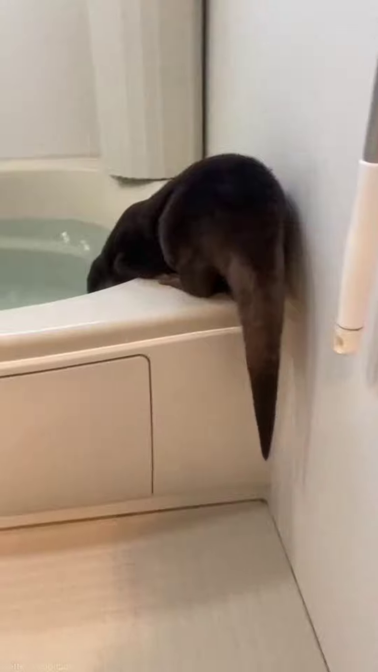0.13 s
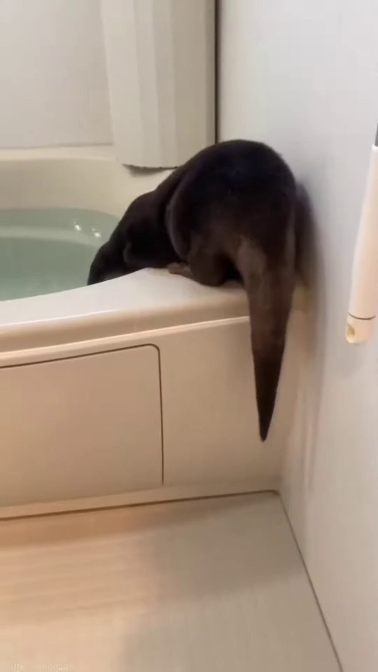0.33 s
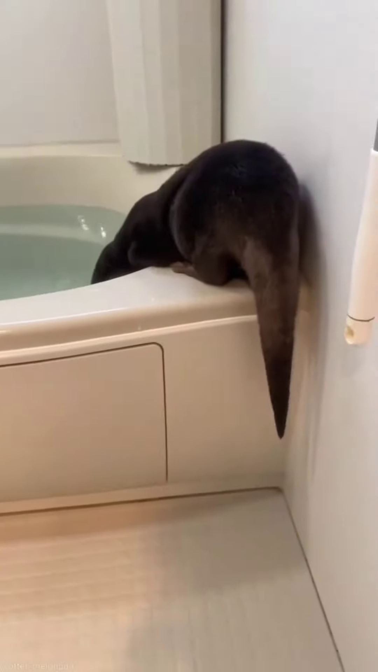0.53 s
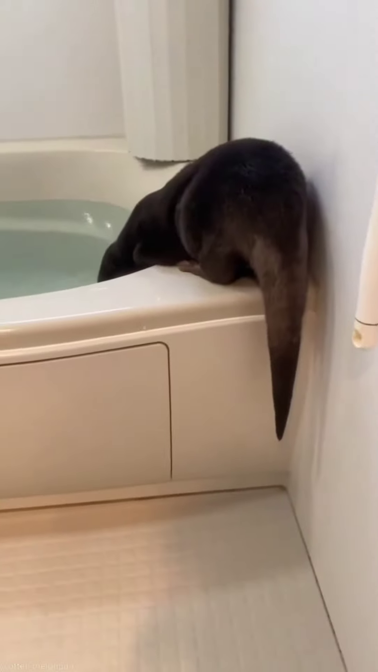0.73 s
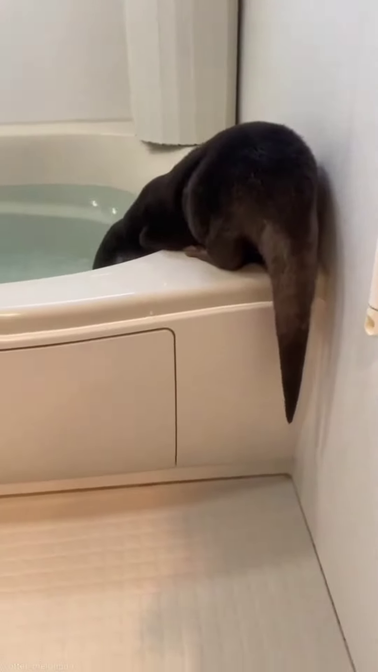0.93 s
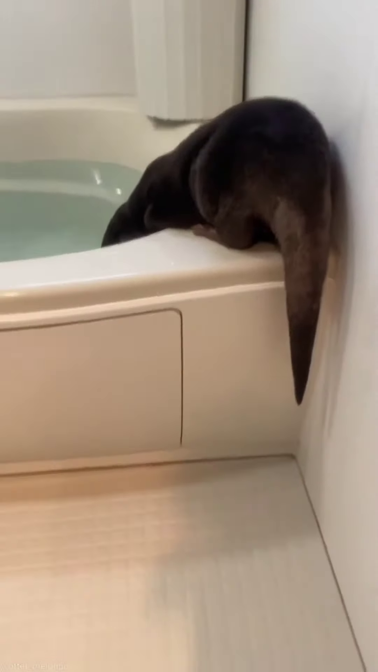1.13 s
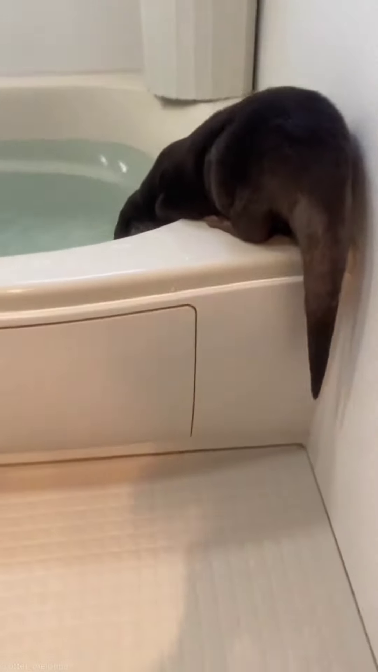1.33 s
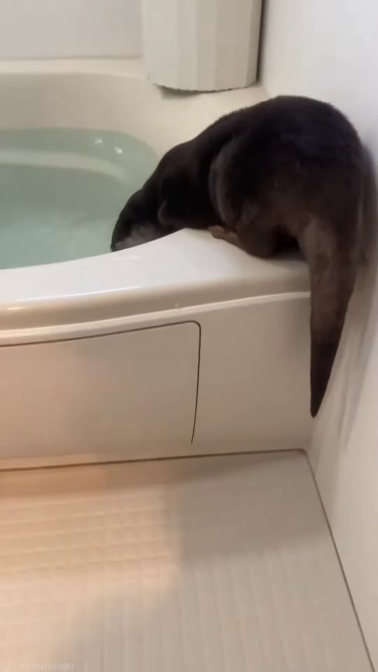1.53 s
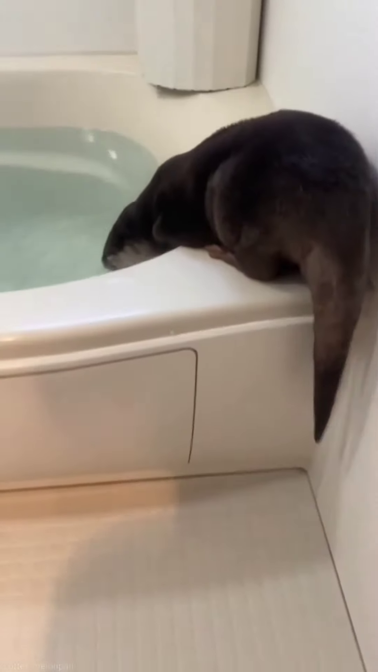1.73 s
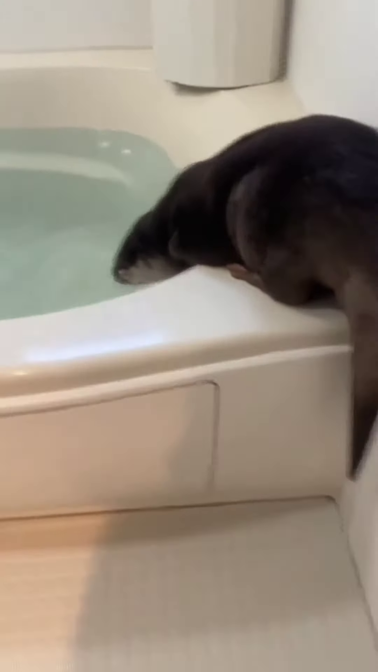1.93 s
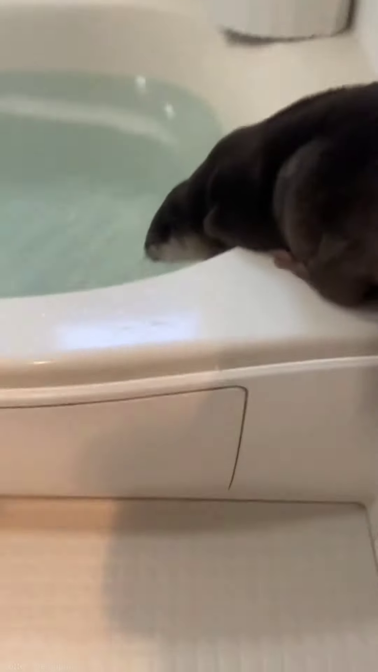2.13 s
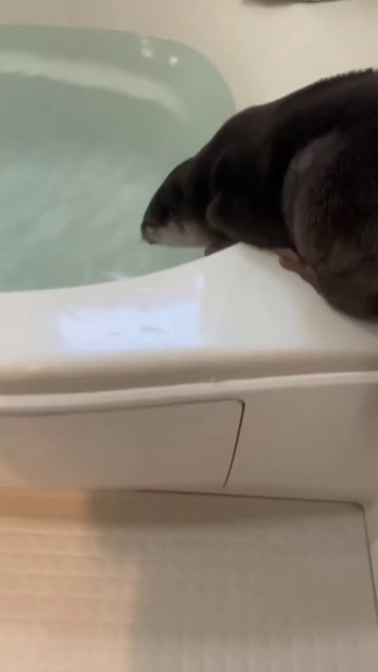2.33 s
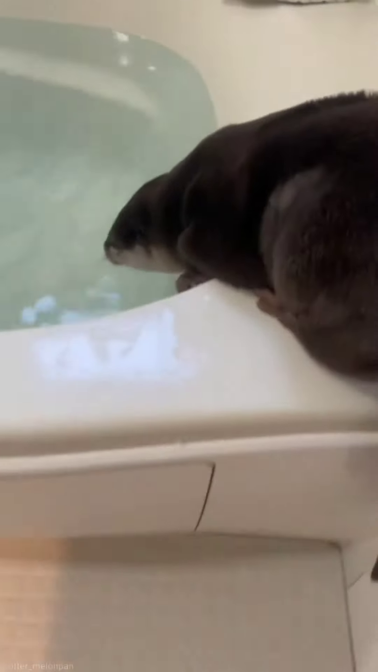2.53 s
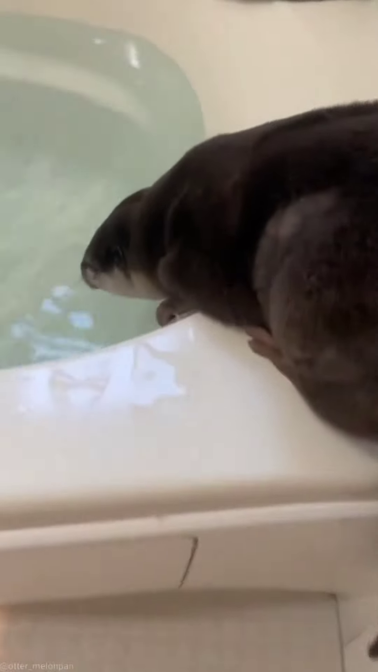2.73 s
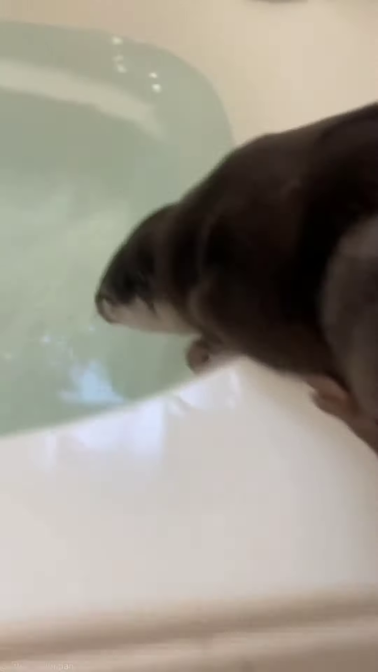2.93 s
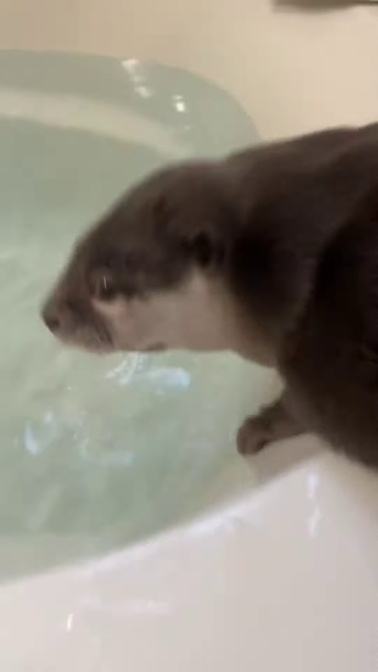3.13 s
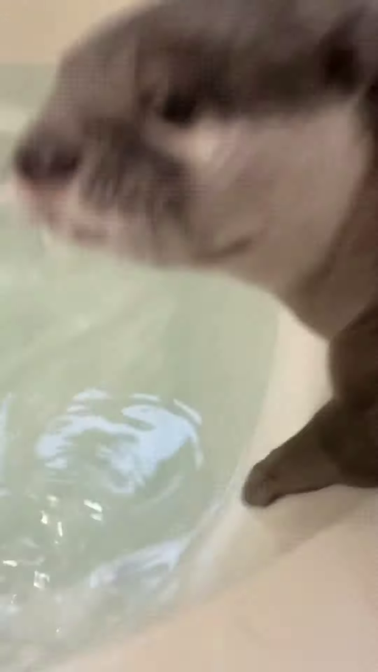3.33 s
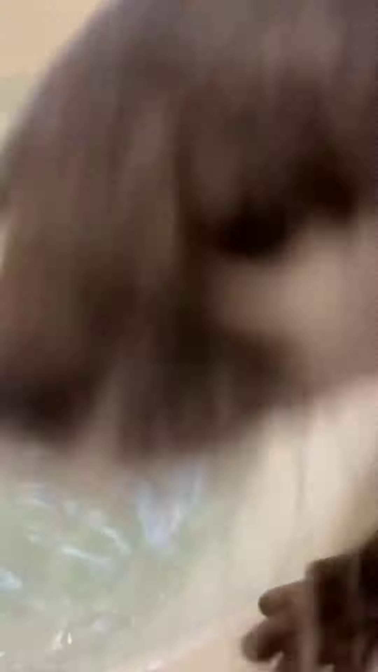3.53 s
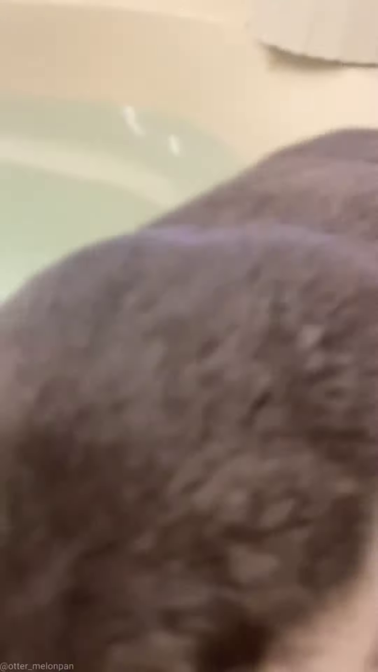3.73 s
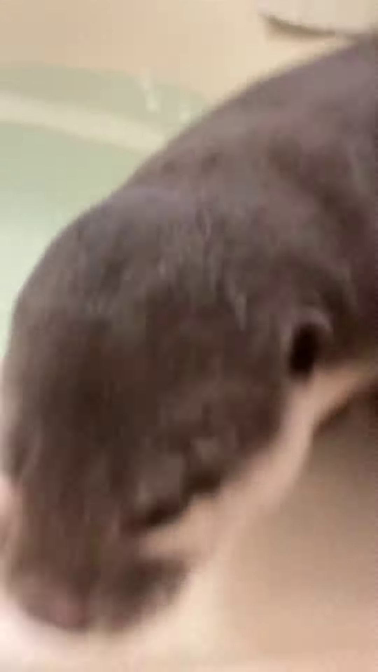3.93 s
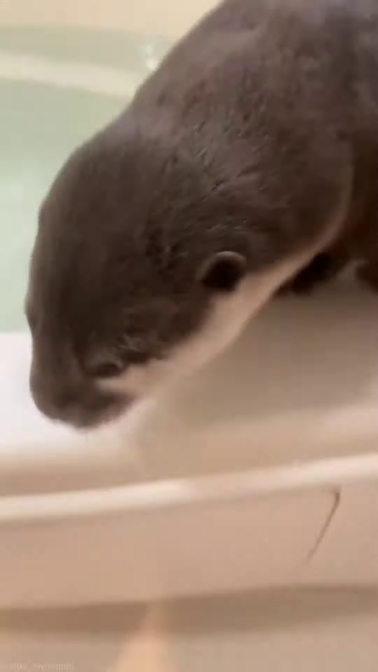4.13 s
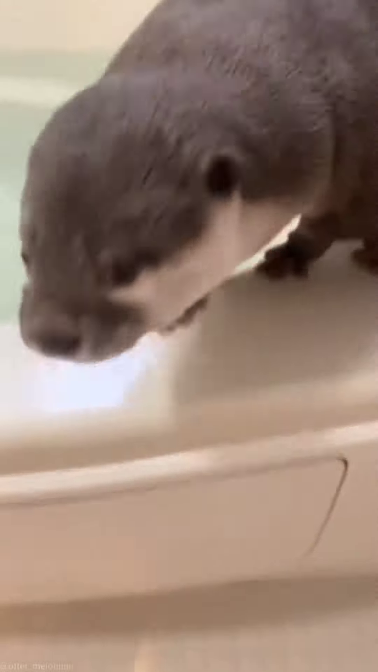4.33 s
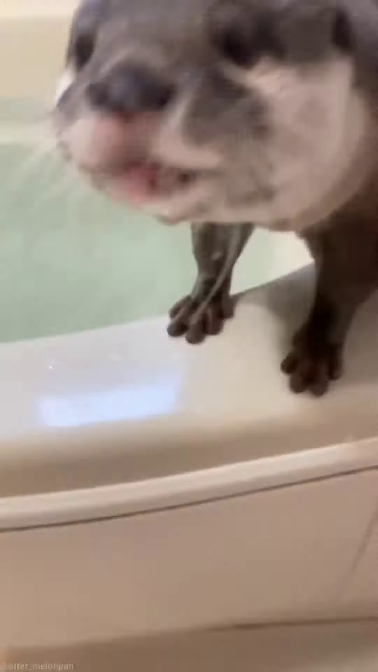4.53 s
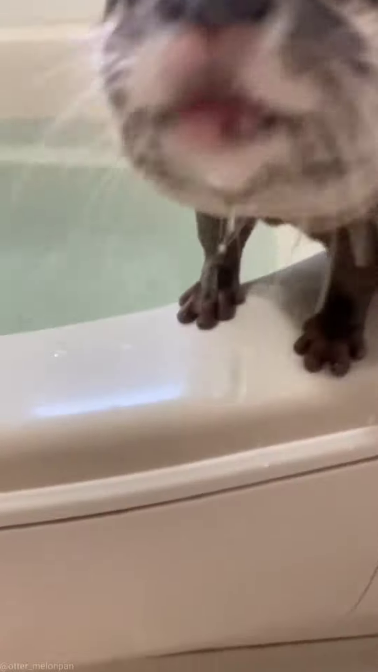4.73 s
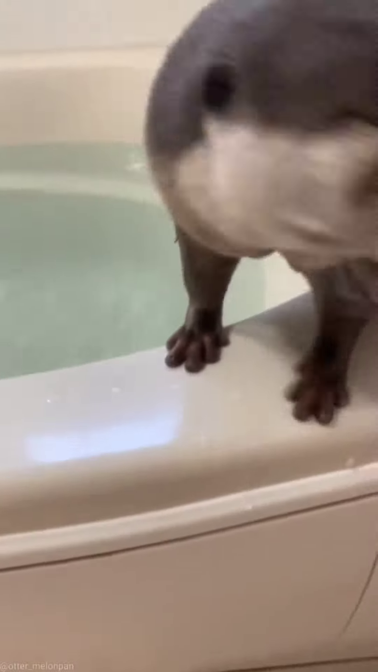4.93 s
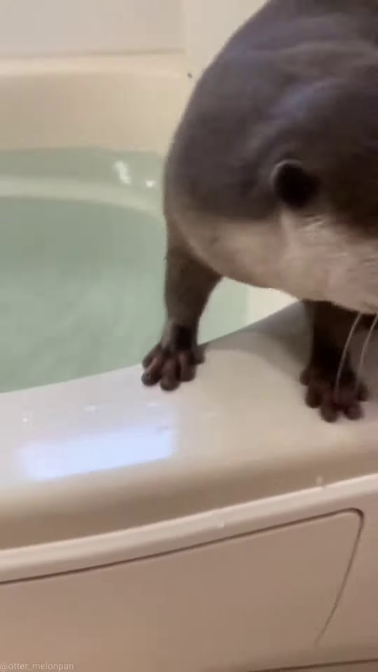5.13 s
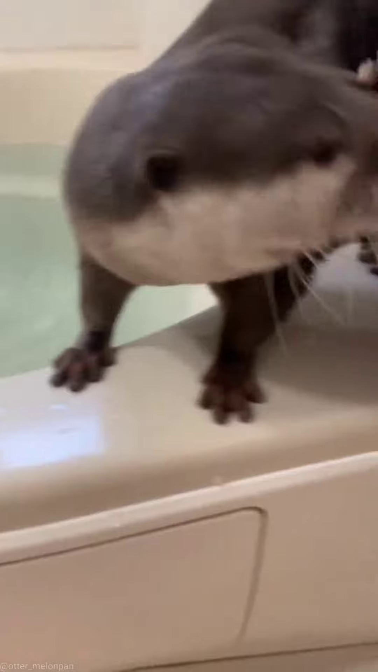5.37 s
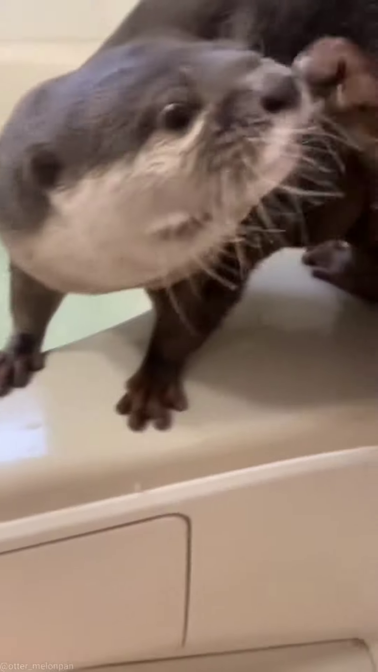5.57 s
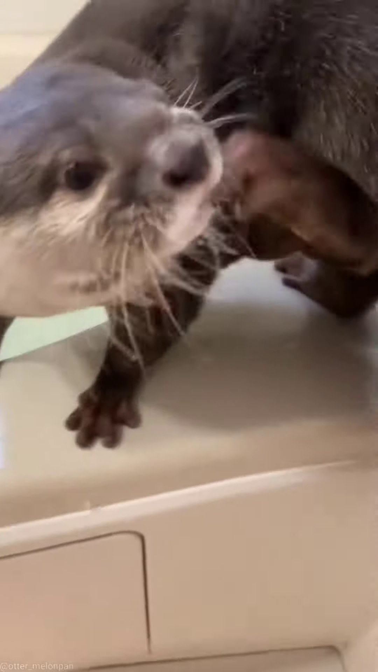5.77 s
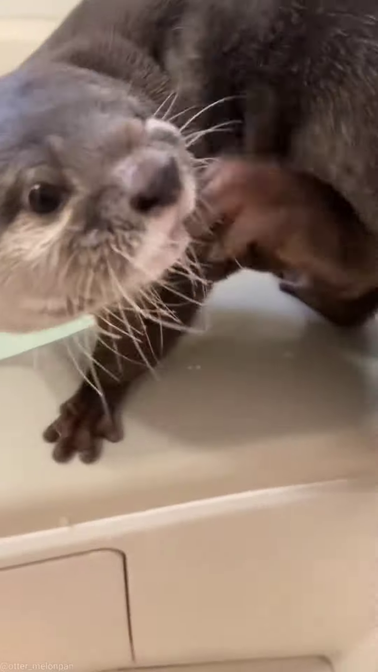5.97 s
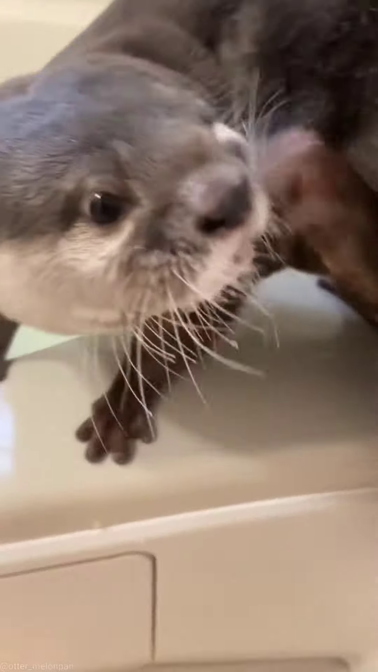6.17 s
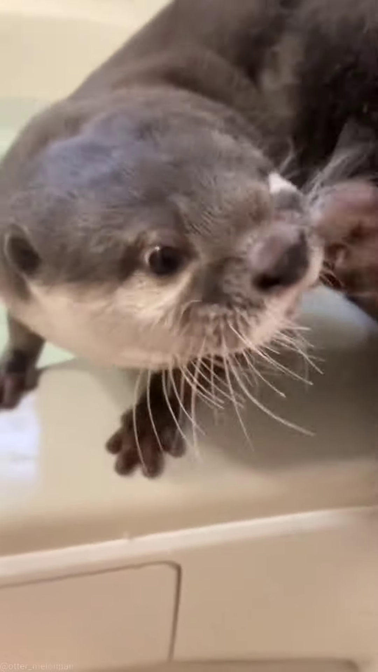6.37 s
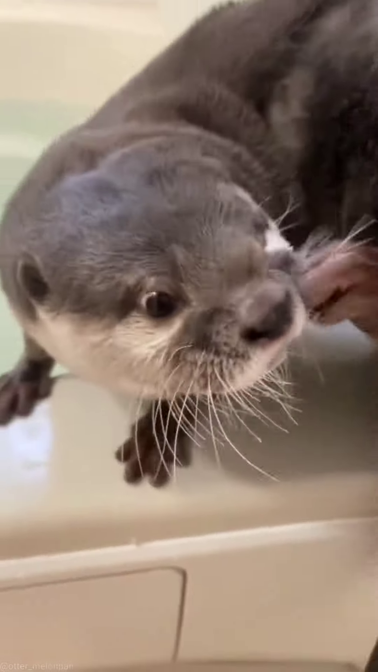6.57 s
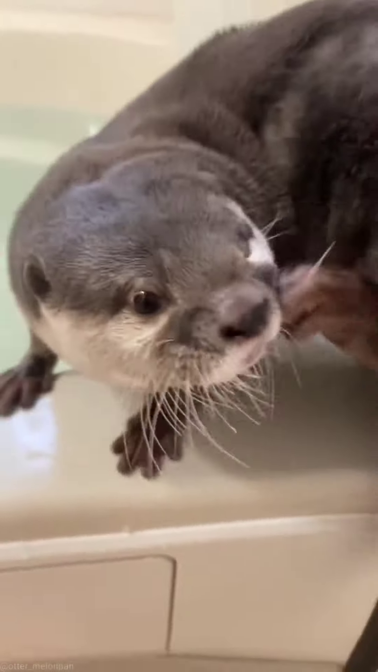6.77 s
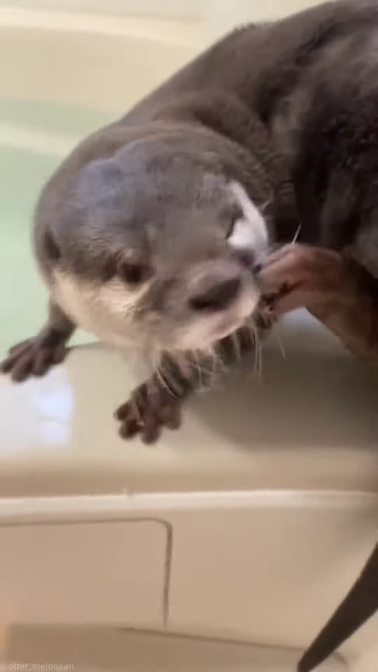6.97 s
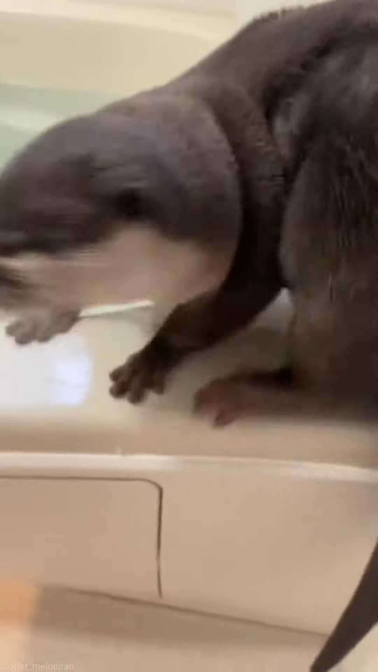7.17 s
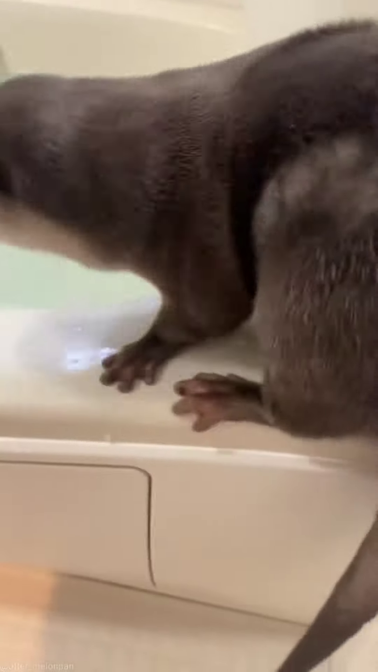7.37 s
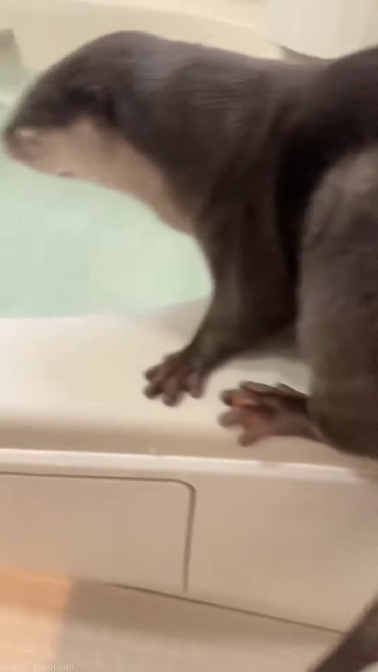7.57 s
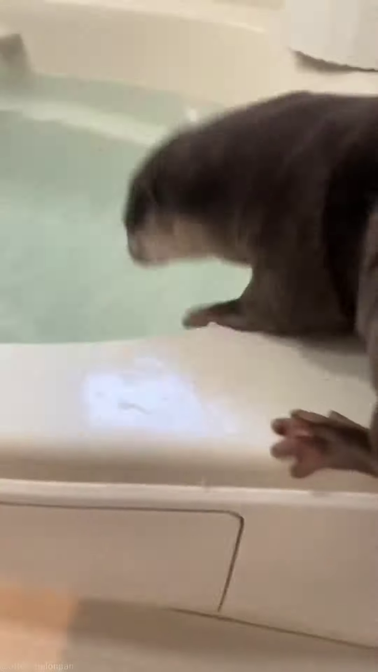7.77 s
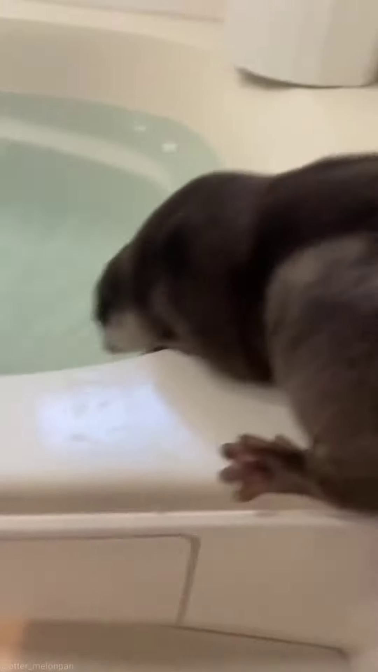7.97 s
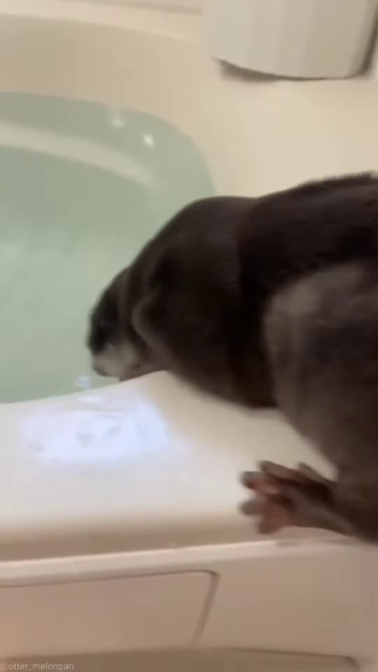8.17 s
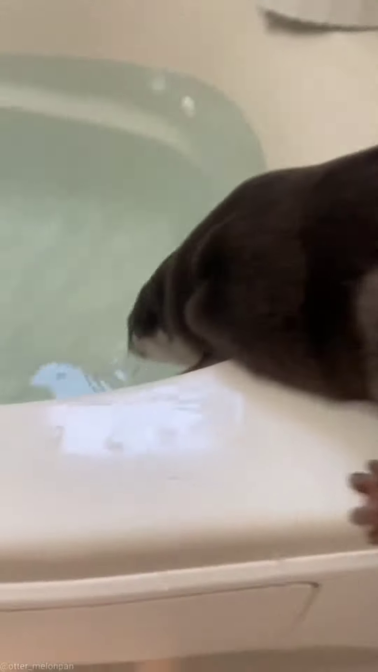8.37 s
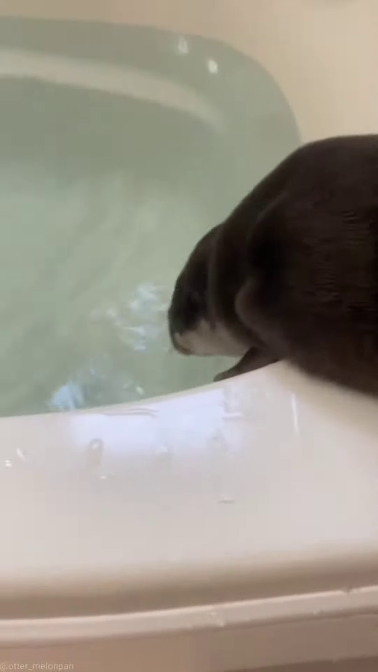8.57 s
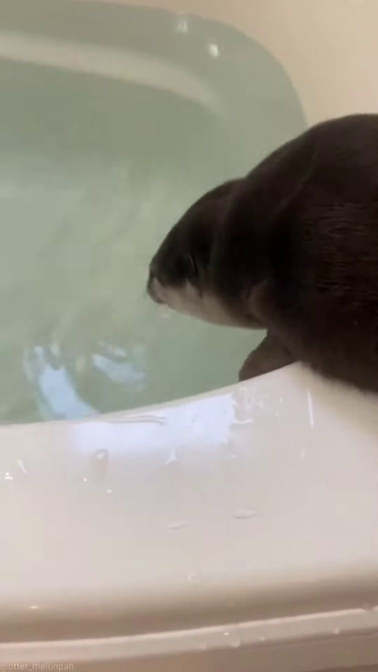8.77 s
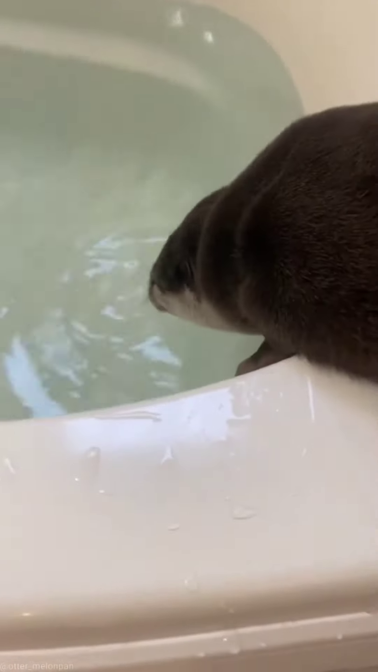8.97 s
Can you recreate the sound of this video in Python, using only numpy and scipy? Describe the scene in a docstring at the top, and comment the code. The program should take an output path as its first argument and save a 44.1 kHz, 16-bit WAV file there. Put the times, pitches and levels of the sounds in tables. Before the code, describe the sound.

An otter on a bathtub rim gives a faint peep, a soft whine and one loud raspy squeal over steadily hissing, gurgling bathwater.

```python
"""An otter on the rim of a bathtub gives a faint peep, a soft closed-mouth whine and a loud, wavering squeal.
Its voice is a stack of harmonics and breath noise, coloured by a throat that opens for the squeal.
Below it, bursting bubbles and shaped noise make the water hiss, fizz, slosh and gurgle in a small bathroom;
wet paws pat and bump on the hollow rim, claws knock and a drop rings, as short fading noises and tones.
The hand-held microphone rumbles a little; its gain control ducks everything under the squeal."""
import sys
import numpy as np
from scipy import signal
from scipy.fft import rfft, irfft
from scipy.io import wavfile
from scipy.ndimage import uniform_filter1d, minimum_filter1d

SR = 44100
rng = np.random.default_rng(int(sys.argv[2]) if len(sys.argv) > 2 else 0)


def output_pcm(signal):
    """Save a mono or channel-first signal as 16-bit PCM at the path in sys.argv[1].

    Samples are clipped to [-1, 1] before scaling.
    """
    pcm = np.clip(np.atleast_2d(signal).T, -1, 1) * 32767
    wavfile.write(sys.argv[1], SR, np.round(pcm).astype(np.int16))


N = 396900
# time of every sample in s, and frequency of every spectrum bin in Hz
T, HZ = np.arange(N) / SR, np.arange(N // 2 + 1) * SR / N


def from_db(db):
    """Turn decibels into a gain factor."""
    return 10 ** (np.asarray(db) / 20)


def rms_one(x):
    """Scale a sound to rms 1."""
    return x / np.sqrt(np.mean(x ** 2) + 1e-20)


def in_time(rows, t=T):
    """Read each column of a time table at the times t, along straight lines between its rows."""
    s, *columns = np.transpose(rows)
    return [np.interp(t, s, column) for column in columns]


def at_hz(points, hz):
    """Read a frequency table on a logarithmic frequency axis."""
    f, value = np.transpose(points)
    return np.interp(np.log(hz + 1e-9), np.log(f), value)


def drift(rate_hz, size=N):
    """Smooth random curve of spread 1: noise that keeps only changes slower than about rate_hz."""
    slow = rfft(rng.standard_normal(N)) * np.exp(-.5 * (HZ / rate_hz) ** 2)
    return rms_one(irfft(slow, N))[:size]


def band(x, low_hz, high_hz, order=2):
    """Keep the band between two frequencies."""
    edges = [low_hz, min(high_hz, .45 * SR)]
    return signal.sosfilt(signal.butter(order, edges, "band", fs=SR, output="sos"), x)


def below(hz, edge_hz, order=8):
    """Soft edge that goes from 1 below edge_hz to 0 above it."""
    return 1 / (1 + (hz / edge_hz) ** order)


def ports(phase_share=1):
    """Left and right response of the two microphone ports; deep bass reaches both alike."""
    # how far the left port leads: f/Hz, phase/rad
    port_phase = [(250, -0.5), (480, 1.3), (700, 1.32), (950, 1.74), (1450, 0), (2000, .25), (2900, 1.5),
                  (3900, 0.84), (4800, 3), (5400, 0.5), (9200, 1.9), (11500, 1), (15000, 1)]
    # left level minus right level: f/Hz, difference/dB
    port_balance = [(120, -0.5), (250, -4.5), (350, -10), (560, -5.5), (760, -4), (1100, 0), (15000, -0.5)]
    lead = 1j * phase_share * at_hz(port_phase, HZ)
    difference = lead + np.log(from_db(at_hz(port_balance, HZ)))
    above_bass = 1 - below(HZ, 130, order=4)
    # each port takes half of the difference
    return np.exp(np.array([[.5], [-.5]]) * difference * above_bass)


def diffuse(gain, shared):
    """Colour a sound that reaches the ports partly alike, partly scattered; left-right mean at rms 1."""
    # share of power that is the same at both ports: f/Hz, share [0-1]
    likeness = [(100, .998), (250, .75), (380, .4), (780, .65), (1200, .35), (1850, 0.82), (2800, .4),
                (4800, .3), (6000, .55), (14000, .38)]
    alike, pair = np.clip(at_hz(likeness, HZ), 0, 1), ports()
    scattered = rfft(rng.standard_normal((2, N)))
    both = pair * (np.sqrt(alike) * rfft(shared) + np.sqrt(1 - alike) * scattered)
    # even out what the mean of the two ports loses or gains at each frequency
    centre_power = alike * abs(pair.mean(0)) ** 2 + (1 - alike) * (abs(pair) ** 2).mean(0) / 2
    out = irfft(both * gain / np.sqrt(centre_power), N)
    return out / np.std(out.mean(0))


def near_walls(x, echo_db=-13):
    """The tub and the tiles close by throw back early echoes, which strengthen or weaken each frequency."""
    # delays of the echoes: left port/s, right port/s
    walls = [(.0043, .00436), (.0097, .00962), (.0161, .01622)]
    echoes = [sum(np.interp(T - late, T, x) for late in port) for port in np.transpose(walls)]
    return from_db(echo_db) * np.array(echoes) / np.sqrt(len(walls))


def bathroom(x, wet_db=0):
    """Dense reflections off hard walls, different at each port; the low band is strongest but dies first."""
    # the tail in bands: low edge f/Hz, high edge f/Hz, relative level/dB, time to fall 60 dB t/s
    room = [(100, 900, -9, .33), (900, 2300, -13, .52), (2300, 15000, -12, .44)]
    t, tail = T[:SR], 0
    for low, high, db, t60 in room:
        noise = band(rng.standard_normal((2, SR)), low, high)
        # a longer tail does not make its band stronger
        tail_energy = np.sum(from_db(-120 * t / t60))
        tail = tail + noise * from_db(db - 60 * t / t60) / np.sqrt(tail_energy)
    # the first reflections need 3 ms to return
    wet = signal.fftconvolve(x[None], tail * (t > .003), axes=1)[:, :N]
    return from_db(wet_db) * wet


def fizz(per_s, spread_db):
    """Tiny bubbles burst at random moments, mostly small, a few large."""
    sizes = from_db(spread_db * np.minimum(rng.exponential(1, N), 4)) * rng.choice([-1, 1], N)
    return rms_one(sizes * (rng.random(N) < per_s / SR))


def water():
    """A steady wash of bursting bubbles, with fine spray on top and lumpy sloshing noise below."""
    # colour of wash and spray: f/Hz, relative level per Hz/dB
    wash_colour = [(500, -3), (580, -1.5), (680, -5), (1080, -7.3), (1500, -2.6), (2000, .5), (2600, 0),
                   (3300, -1.5), (4200, -2.3), (4850, -6), (5600, -3), (7000, -5), (10000, -7.7),
                   (13500, -10), (14300, -18)]
    # colour of the low sloshing: f/Hz, relative level per Hz/dB
    slosh_colour = [(25, -16), (60, -3.5), (100, 3.5), (165, -3), (225, .3), (290, -6), (385, -2.5),
                    (470, -8), (600, -6.5)]
    # strength of the sloshing: t/s, level/dB before it wavers
    sloshing = [(.2, -44.8), (2, -44), (3.6, -41.8), (4.3, -42.5), (4.6, -45.5), (5.25, -45.5), (5.6, -41),
                (6.4, -42.3), (9, -42)]
    wash_db, spray_db = -34.2, -37.6  # before surges, swarms and echoes
    colour = from_db(at_hz(wash_colour, HZ)) * (1 - below(HZ, 478))
    lower = below(HZ, 6510)
    surge = drift(16)
    wash = diffuse(colour * np.sqrt(lower), fizz(per_s=6000, spread_db=3.0))
    wash = wash * from_db(wash_db + .65 * surge)
    # bubbles of each size come in swarms of their own
    for hz in np.geomspace(700, 5600, num=7):
        wash = wash + .14 * drift(12) * band(wash, hz / 1.2, hz * 1.2, order=1)
    spray = diffuse(colour * np.sqrt(1 - lower), fizz(per_s=5000, spread_db=2.5))
    spray = spray * from_db(spray_db + .5 * surge + .4 * drift(20))
    low_colour = from_db(at_hz(slosh_colour, HZ)) * below(HZ, 564) * (1 - below(HZ, 25, order=4))
    slosh = diffuse(low_colour, rng.standard_normal(N))
    slosh = slosh * from_db(in_time(sloshing)[0] + 1.7 * drift(14))
    # echoes off the tub's walls comb the wash
    wash = wash + near_walls(wash.mean(0))
    return wash + spray + slosh


def gurgle():
    """Lapping water sets the hollow of the tub ringing unevenly, in two sets of modes that trade places."""
    # strength of the ringing: t/s, first set level/dB, second set level/dB, before it wavers
    gurgle_levels = [(.2, -46, -60), (1.1, -43.5, -60), (2.45, -46, -60), (2.8, -53, -60), (4.7, -55, -54),
                     (5.0, -53, -44), (5.5, -53, -54), (6.8, -50, -60), (7.3, -57, -62), (8.8, -58, -52)]
    # modes of the first set: f/Hz, width/Hz, relative level/dB
    tub_modes = [(777, 48, 1), (885, 55, -4)]
    # modes of the second set: f/Hz, width/Hz, relative level/dB
    tub_low_modes = [(581, 55, 0), (1750, 100, -5)]
    out = 0
    for table, level_db in zip((tub_modes, tub_low_modes), in_time(gurgle_levels)):
        modes = sum(from_db(db) / (1 + ((HZ - hz) / width) ** 2 * 2) for hz, width, db in table)
        ringing = diffuse(modes, fizz(per_s=200, spread_db=3))
        out = out + ringing * from_db(level_db + 1.6 * drift(11))
    return out


def grip(length_s=.035):
    """The hand shifts its grip: deep noise swells up and fades as handling rumble."""
    # the swells: centre t/s, level/dB
    grips = [(1.87, -39), (1.95, -47), (2.46, -43), (2.62, -45), (2.96, -42)]
    swell = sum(from_db(db) * np.exp(-((T - s) / length_s) ** 2) for s, db in grips)
    return swell * rms_one(band(rng.standard_normal(N), 28, 83))


def drips(t60=.06, attack_s=.004, rise_per_s=1.2):
    """A drop falls into the bath and traps a bubble that rings briefly, rising a little in pitch."""
    # the drop: t/s, level/dB before its soft attack, starting f/Hz
    drops = [(3.955, -25, 1000)]
    out, t = np.zeros(N), T[:SR // 4]
    for s, db, hz in drops:
        at = round(s * SR)
        fade = from_db(db - 60 * t / t60) * (1 - np.exp(-t / attack_s))
        # rise_per_s is the share of its starting pitch that the bubble climbs in a second
        out[at:at + len(t)] += fade * np.sin(2 * np.pi * hz * t * (1 + rise_per_s / 2 * t))
    return out + bathroom(out)


def pats(grain_db=2.5):
    """Each wet pat or splash throws a short, uneven burst of spatter noise."""
    # the pats: t/s, level/dB before the attack, centre f/Hz, time to fall 30 dB t/s, attack t/s
    touches = [(.265, -33, 4500, .05, .001), (1.53, -33, 3000, .06, .001), (2.487, -32, 7000, .03, .001),
               (3.283, -33, 1300, .04, .001), (3.908, -33, 3800, .12, .005), (4.053, -26, 8000, .04, .001),
               (5.12, -30, 5000, .04, .001), (7.383, -26, 10000, .035, .001),
               (7.394, -27, 12000, .12, .003), (8.155, -25, 3200, .17, .025),
               (8.172, -22.5, 5500, .03, .0005), (8.181, -27, 4000, .17, .004), (8.75, -33, 3700, .2, .02),
               (8.853, -29.5, 3900, .08, .001)]
    out, t = np.zeros((2, N + SR)), T[:SR // 2]
    for s, db, hz, decay, attack_s in touches:
        at = round(s * SR)
        # one noise for each port plus one that both share
        noise = rng.standard_normal((2, len(t))) + rng.standard_normal(len(t))
        grains = from_db(grain_db * rms_one(band(rng.standard_normal(len(t)), 80, 700)))
        spatter = rms_one(band(noise * grains, hz / 1.8, min(hz * 1.6, 13500), order=1))
        out[:, at:at + len(t)] += spatter * from_db(db - 30 * t / decay) * (1 - np.exp(-t / attack_s))
    out = out[:, :N]
    return out + bathroom(out.mean(0), wet_db=3)


def light_steps(count=16):
    """The otter shifts, scratches and turns in uneven runs of soft steps on changing spots of the rim."""
    # the runs: start t/s, length t/s, level/dB before the trim in bumps()
    shuffles = [(2.03, .6, -34), (6.04, .22, -30), (7.17, .3, -30.5)]
    gap_s, step_hz, spread_octaves = .04, 235, .4
    steps = []
    for start, length, db in shuffles:
        for k, (late, spot) in enumerate(rng.standard_normal((count, 2))):
            if k * gap_s < length:
                steps.append((start + gap_s * (k + .2 * late), db, step_hz * 2 ** (spread_octaves * spot)))
    return steps


def bumps(t60=.17, attack_s=.004, trim_db=-5.3):
    """Soft paws thud on the hollow rim, which rings briefly: narrow low noise that fades away."""
    # the heavier paws: t/s, level/dB before the trim, ring f/Hz
    paws = [(0.454, -32, 199), (0.759, -31, 172), (0.94, -26.5, 194), (1.151, -29, 202),
            (2.269, -25.5, 199), (2.38, -25, 163), (2.829, -33, 382), (3.703, -27, 207), (3.945, -30, 147),
            (6.049, -29, 225), (6.121, -26, 380), (6.181, -22, 245), (6.537, -29, 225), (6.668, -27, 210),
            (6.825, -28, 355), (6.957, -31, 353), (7.175, -28, 240), (7.255, -28, 380), (7.26, -28, 245),
            (7.325, -27, 213), (7.42, -30, 120)]
    out, t = np.zeros(N), T[:SR // 2]
    for s, db, hz in list(paws) + light_steps():
        ring = rms_one(band(rng.standard_normal(SR), hz / 1.25, hz * 1.25))[-len(t):]
        at = round(s * SR)
        out[at:at + len(t)] += ring * from_db(db + trim_db - 60 * t / t60) * (1 - np.exp(-t / attack_s))
    return irfft(rfft(out) * ports(), N)


def knocks(spread_db=2.5):
    """A quick scrabble of claws; each knock strikes the tub shell's modes with strengths of its own."""
    # the claws: t/s, level/dB before each mode's own level
    claws = [(3.905, -31), (3.9115, -31), (3.922, -35), (3.928, -32), (3.9315, -29), (3.938, -34)]
    # the shell's modes: f/Hz, relative level/dB, time to fall 60 dB t/s
    shell_modes = [(190, -9, .06), (410, -8, .04), (640, -4, .035), (760, -3, .03), (930, -4, .025),
                   (1310, -3, .025), (1520, -4, .018), (1950, -3, .018), (2300, -6, .015), (3900, -6, .012)]
    out, t = np.zeros(N), T[:SR // 4]
    hz, mode_db, t60 = np.transpose(shell_modes)[:, :, None]
    for s, db in claws:
        strength = from_db(db + mode_db + spread_db * rng.standard_normal(hz.shape))
        strength = strength * rng.choice([-1, 1], hz.shape)
        at = round(s * SR)
        ringing = strength * from_db(-60 * t / t60) * np.sin(2 * np.pi * hz * t)
        out[at:at + len(t)] += np.sum(ringing, axis=0)
    return irfft(rfft(out) * ports(), N) + bathroom(out)


def call(gesture, pitch, resonance_db, width_hz, rasp, jitter, flutter_hz, shimmer_db, air_db,
         dull_db=0, opening_s=.16, treble_hz=2900, ring=None, ring_width_hz=420):
    """Harmonics of the vocal folds slide through moving throat resonances; rasp shakes pitch and strength."""
    # throat with the mouth shut: f/Hz, relative level/dB
    mouth_shut = [(750, -3.5), (1500, -.5), (2240, -7.5), (2450, -7), (3000, -10), (3750, -16.5),
                  (4800, -21), (5700, -18), (9000, -32)]
    # throat with the mouth open: f/Hz, relative level/dB
    mouth_open = [(680, -14.5), (1200, -20), (1400, -15.5), (1780, -14), (1880, -17), (2080, -6),
                  (2400, -13), (2680, -12), (2920, -25), (3120, -25), (3460, -14), (3780, -4), (4230, -6.5),
                  (4850, -22), (5600, -13.5), (7100, -21.5), (8600, -39), (10300, -30), (11500, -46)]
    jaw_opens_s, jaw_time_s = 4.398, .012  # the squeal starts through a shut mouth
    full_voice_db = -20  # around this effort the fundamental moves by only a share as much
    follows_shut, follows_open = .8, .12  # that share, with the mouth shut and open
    span = (T > gesture[0][0]) & (T < gesture[-1][0])
    t, out = T[span], np.zeros(N)
    level_db, centre_hz = in_time(gesture, t)
    rough, = in_time(rasp, t)

    # a quick, nearly regular tremor of the folds, with a little irregular unevenness
    tremor = np.sin(2 * np.pi * np.cumsum(flutter_hz * (1 + .35 * drift(12, len(t)))) / SR)
    smooth_pitch = uniform_filter1d(in_time(pitch, t)[0], size=160)
    f0 = smooth_pitch * (1 + jitter * rough * (tremor + 1.5 * drift(250, len(t))))
    phase = 2 * np.pi * np.cumsum(f0) / SR
    k = np.arange(1, 18)[:, None]  # harmonic numbers
    partial_hz = k * f0

    # the jaw goes from shut (0) to open (1)
    jaw = .5 + .5 * np.tanh((t - jaw_opens_s) / jaw_time_s)
    throat_db = (1 - jaw) * at_hz(mouth_shut, partial_hz) + jaw * at_hz(mouth_open, partial_hz)
    mouth_db = resonance_db * np.exp(-((partial_hz - centre_hz) / width_hz) ** 2)
    strength = from_db(throat_db + mouth_db)
    if ring is not None:
        ring_hz, ring_db = in_time(ring, t)
        strength = strength * from_db(ring_db * np.exp(-((partial_hz - ring_hz) / ring_width_hz) ** 2))
    # a dulled treble comes in during the first moments of the call
    still_dull = np.exp(-((t - t[0]) / opening_s) ** 2)
    strength = strength * from_db(-dull_db * still_dull * (1 - below(partial_hz, treble_hz, order=30)))

    # rasp shifts energy among the partials, most among the high ones, and keeps the total
    shimmer = rms_one(band(rng.standard_normal((len(k), SR)), 12, 60))[:, :len(t)]
    shaken = strength * from_db(shimmer_db * (k / 4) ** .15 * np.sqrt(rough.clip(0)) * shimmer)
    strength = shaken * np.sqrt(np.sum(strength ** 2, axis=0) / np.sum(shaken ** 2, axis=0))
    # the overtones swell with all of the effort, the fundamental least with the mouth open
    follows = (1 - jaw) * follows_shut + jaw * follows_open
    effort_db = np.where(k == 1, follows, 1) * (level_db - full_voice_db)
    gain = strength * from_db(full_voice_db + effort_db)
    # the high partials also wander in phase, which breaks up their lines
    wander = .08 * k * rough * rms_one(band(rng.standard_normal((len(k), SR)), 30, 200))[:, :len(t)]
    start_phase = rng.uniform(0, 2 * np.pi, k.shape)
    tone = np.sum(gain * np.sin(k * phase + wander + start_phase), axis=0)
    # strong and weak cycles alternate, most at the harshest moments, adding tones between the partials
    tone = tone * (1 + .55 * rough ** 2 * np.sin(phase / 2))

    # turbulence escapes once per cycle and takes a milder form of the throat's colour
    throat = mouth_open if jaw.mean() > .5 else mouth_shut
    air_colour = from_db(.5 * at_hz(throat, HZ)) * below(HZ, 9000) * (1 - below(HZ, 2300))
    air = rms_one(irfft(rfft(rng.standard_normal(N)) * air_colour, N))[span]
    air = air * (1 + np.cos(phase)) * np.sqrt(rough.clip(0))
    air = air * from_db(air_db) * np.sqrt(np.sum(gain ** 2, axis=0))
    out[span] = (np.sqrt(2) * tone + air) * signal.windows.tukey(len(t), .05)
    return out


def otter():
    """A faint peep runs into a whine; then the mouth opens for the squeal, which rings in the room."""
    # effort and lips in each call: t/s, effort/dB before the throat's colour, mouth resonance f/Hz
    peep_gesture = [(3.265, -58, 2500), (3.285, -35, 2450), (3.305, -44, 2450), (3.33, -44, 2450),
                    (3.39, -58, 2450)]
    whine_gesture = [(3.355, -58, 2100), (3.385, -51, 2200), (3.425, -40, 2300), (3.47, -37.5, 2300),
                     (3.497, -27, 2050), (3.545, -28, 1950), (3.6, -30.5, 1820), (3.65, -31, 1650),
                     (3.69, -31.5, 1570), (3.71, -27.5, 1480), (3.735, -28.5, 1400), (3.747, -34, 1100),
                     (3.76, -50, 1000), (3.8, -60, 1000)]
    squeal_gesture = [(4.345, -48, 800), (4.36, -38, 800), (4.385, -34, 900), (4.41, -16, 2110),
                      (4.421, -7.5, 2110), (4.433, -15, 2110), (4.452, -7.5, 2110), (4.51, -7.5, 2050),
                      (4.535, -10, 2450), (4.565, -10, 2550), (4.58, -9, 2000), (4.62, -8, 1950),
                      (4.64, -11, 2250), (4.66, -11, 2200), (4.685, -9, 2300), (4.73, -9, 2330),
                      (4.76, -9, 2050), (4.785, -6.5, 2100), (4.815, -10.5, 2100), (4.84, -24, 2100),
                      (4.89, -42, 2100)]
    # pitch of each call before the tremor: t/s, f/Hz
    peep_pitch = [(3.26, 850), (3.285, 850), (3.32, 905), (3.36, 860)]
    whine_pitch = [(3.37, 682), (3.398, 692), (3.416, 765), (3.432, 793), (3.46, 792), (3.487, 804),
                   (3.5, 797), (3.521, 738), (3.546, 752), (3.565, 718), (3.582, 740), (3.63, 750),
                   (3.68, 751), (3.705, 768), (3.75, 711)]
    squeal_pitch = [(4.354, 840), (4.366, 795), (4.38, 770), (4.39, 690), (4.422, 708), (4.435, 675),
                    (4.462, 718), (4.485, 692), (4.497, 662), (4.517, 677), (4.53, 613), (4.544, 626),
                    (4.57, 623), (4.58, 646), (4.592, 650), (4.602, 629), (4.62, 663), (4.63, 632),
                    (4.65, 608), (4.656, 535), (4.662, 530), (4.668, 620), (4.688, 642), (4.699, 587),
                    (4.707, 608), (4.715, 577), (4.724, 627), (4.734, 578), (4.764, 618), (4.788, 701),
                    (4.83, 712)]
    # a moving upper resonance, in the squeal moved by the tongue: t/s, centre f/Hz, height/dB
    whine_ring = [(3.4, 2300, 3), (3.47, 2400, 4), (3.51, 2300, 0), (3.58, 2200, 2), (3.62, 2600, -1),
                  (3.66, 2500, -4), (3.7, 2500, -4), (3.725, 3000, 4)]
    squeal_ring = [(4.39, 5500, 4), (4.42, 5550, 7), (4.44, 5500, 6), (4.47, 4300, 1), (4.52, 3950, -1),
                   (4.55, 3750, 7), (4.58, 3780, 2), (4.62, 3950, 1), (4.68, 3850, 2), (4.73, 3650, -1),
                   (4.78, 4000, 2), (4.82, 4200, -4)]
    # rasp of the squeal: t/s, roughness [0-1]
    squeal_rasp = [(4.38, .22), (4.5, .28), (4.56, .22), (4.62, .27), (4.657, .42), (4.682, .26),
                   (4.73, .36), (4.77, .32), (4.80, .08)]
    calm = [(3.4, .2), (3.8, .15)]  # rasp of peep and whine: t/s, roughness [0-1]
    peep = call(peep_gesture, peep_pitch, resonance_db=9, width_hz=500, rasp=calm, jitter=.06,
                flutter_hz=45, shimmer_db=5, air_db=-12)
    whine = call(whine_gesture, whine_pitch, resonance_db=12, width_hz=520, rasp=calm, jitter=.012,
                 flutter_hz=40, shimmer_db=4, air_db=-30, ring=whine_ring)
    squeal = call(squeal_gesture, squeal_pitch, resonance_db=6, width_hz=300, rasp=squeal_rasp, jitter=.016,
                  flutter_hz=70, shimmer_db=5.5, air_db=-17, dull_db=4, ring=squeal_ring)
    voice = peep + whine + squeal
    direct = irfft(rfft(voice) * ports(phase_share=.75), N)
    return direct + near_walls(voice) + bathroom(voice)


def scene():
    """The otter over the sounds of the tub."""
    return water() + gurgle() + grip() + drips() + pats() + bumps() + knocks() + otter()


def gain_control(x):
    """Loud sound turns the gain down; after a short hold it returns quickly, then ever more slowly."""
    # stages of the return: share of the cut [0-1], speed/dB per s
    recovery = [(.58, 70), (.23, 4), (.19, .18)]
    limit_db, limit_share = -17.6, .88  # threshold, share of the excess taken off
    attack_s, hold_s = .022, .07
    power = np.abs(uniform_filter1d(np.mean(x ** 2, axis=0), size=600))
    level_db = 10 * np.log10(power + 1e-12)
    held = int(hold_s * SR)
    # the filter looks back, so the largest recent excess is held
    under_db = minimum_filter1d(np.minimum(limit_db - level_db, 0), held, origin=(held - 1) // 2)
    excess_db = -limit_share * under_db
    # each stage rises at once and falls no faster than its speed
    cut_db = sum(np.maximum.accumulate(share * excess_db + rate * T) - rate * T for share, rate in recovery)
    keep = np.exp(-1 / (attack_s * SR))
    return x * from_db(-signal.lfilter([1 - keep], [1, -keep], cut_db))


def record(dry):
    """The sound starts abruptly and passes the gain control; a steep filter cuts the top."""
    start_s, cutoff_hz = .197, 15700
    controlled = gain_control(dry * (T >= start_s))
    return signal.sosfilt(signal.ellip(12, .1, 95, cutoff_hz, fs=SR, output="sos"), controlled)


dry = scene()
out = record(dry)
output_pcm(out)
```